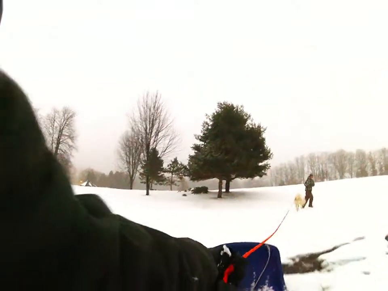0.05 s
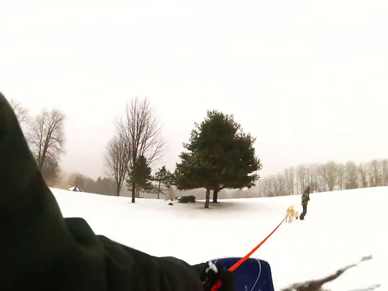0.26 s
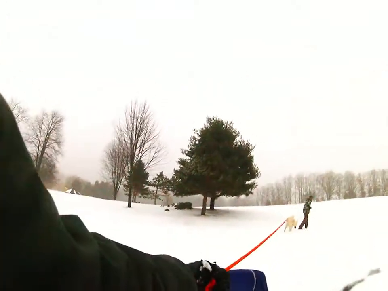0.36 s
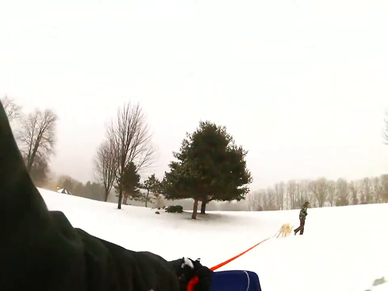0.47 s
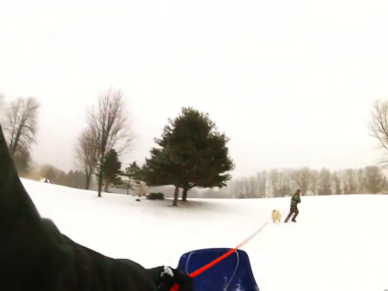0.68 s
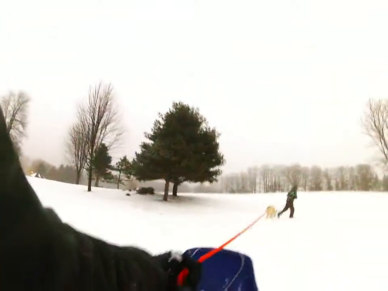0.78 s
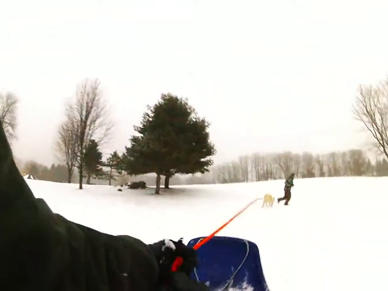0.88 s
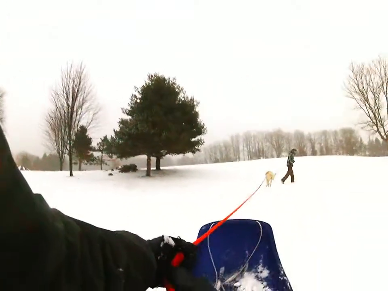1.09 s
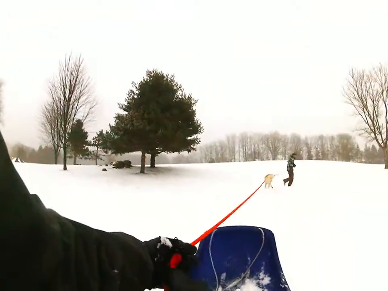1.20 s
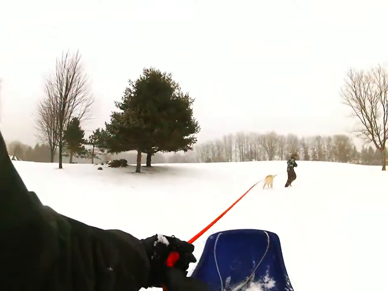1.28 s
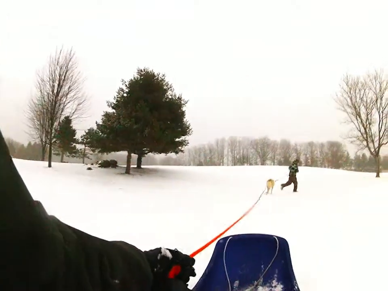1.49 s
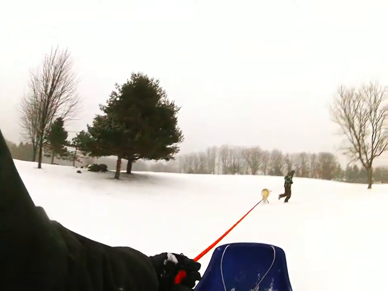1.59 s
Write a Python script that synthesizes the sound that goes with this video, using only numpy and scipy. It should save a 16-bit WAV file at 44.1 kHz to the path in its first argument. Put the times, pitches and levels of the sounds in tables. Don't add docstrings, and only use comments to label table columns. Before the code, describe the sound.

A plastic sled glides over snow with a soft hiss and light scrapes, then hits rough crust with a hard crack, hollow knocks and rasping, before easing to quiet hiss; outdoors, close, muffled camera on the rider.

```python
import sys
import numpy as np
from scipy import signal
from scipy.fft import rfft, irfft
from scipy.io import wavfile
from scipy.ndimage import uniform_filter1d

SR = 44100
rng = np.random.default_rng(int(sys.argv[2]) if len(sys.argv) > 2 else 0)


def voltage_ratio(level):
    return 10 ** (np.asarray(level, float) / 20)


def to_wav(s):
    ch = np.atleast_2d(s).T
    pcm = np.round(np.clip(ch, -1, 1) * 32767)
    wavfile.write(sys.argv[1], SR, pcm.astype(np.int16))


N = 72765


def level(x):
    return x / np.sqrt(np.mean(x ** 2))


def curve(table, axis=1):
    points = np.array(table)
    return np.interp(np.arange(N) / SR, points[:, 0], points[:, axis])


def colour(x, table):
    hz, db = np.array(table).T
    log_hz = np.log(np.fft.rfftfreq(N, 1 / SR) + 1)
    return irfft(rfft(x) * voltage_ratio(np.interp(log_hz, np.log(hz), db)), N)


def ring(x, table):
    out = 0
    for k, (hz, width, db) in enumerate(table):
        out = out + (-1) ** k * voltage_ratio(db) * signal.lfilter(*signal.iirpeak(hz, hz / width, SR), x)
    return out


def band(x, order, hz, kind="band"):
    return signal.sosfilt(signal.butter(order, hz, kind, fs=SR, output="sos"), x)


def walk(rate):
    hold = int(SR / rate)
    v = np.repeat(rng.standard_normal(N), hold)[:N]
    v = uniform_filter1d(uniform_filter1d(v, hold), hold)
    return v / v.std()


def grains(rate, spread_db):
    chance, sign, size = rng.random((3, N))
    clicks = (chance < rate / SR) * np.sign(sign - .5)
    return level(clicks * voltage_ratio(-spread_db * np.log(size + 1e-9)))


# (f/Hz, width/Hz, level/dB)
CASE_MODES = [(1141, 103, 4.5), (1702, 302, 2), (1895, 154, 4), (2452, 218, 1.5), (3014, 350, -13),
              (3430, 88, 0), (3980, 100, -12)]


def case(x):
    return ring(x, CASE_MODES) + voltage_ratio(-10) * x


# (t/s, pressure level/dB, lumpiness/dB)
PRESSURE = [(0,-53,-1.5),(.16,-52.5,-7.5),(.248,-44.5,-6),(.28,-55.5,-3),(.41,-50,-5.5),(.478,-47,5.5),(.492,-40,9),(.535,-42,0.5),(.565,-41.5,-8.5),(.62,-40,0.5),(.675,-38.5,4),(.735,-45.5,9.5),(.79,-42,2),(.86,-47,-6),(.97,-45,-10.5),(1.015,-50,-2),(1.09,-57.5,-4),(1.65,-60,-1.5)]
# (f/Hz, width/Hz, level/dB)
HULL_MODES = [(227, 40, -0.5), (298.5, 20.8, 4.5), (340, 33, 1), (388, 27.2, 4), (430, 114, -4),
              (546, 117, -4), (863, 590, -13.5)]
# (f/Hz, level/dB per Hz)
RASP_COLOUR = [(500, 5.5), (1200, -5.5), (2500, -4), (4500, -12), (7000, -27.5), (10000, -5.5),
               (12000, -9.5), (15000, -13)]


def scrape():
    pressure_db, lumpy_db = curve(PRESSURE), curve(PRESSURE, axis=2)
    stutter = walk(46.23)
    hull = level(ring(grains(800, 1.8), HULL_MODES))
    hull_db = pressure_db + lumpy_db - 4.5 + 0.58 * stutter + 0.27 * walk(30.2)
    rasp = level(case(colour(grains(5000, 1.75), RASP_COLOUR)))
    flicker_db = 1.2 * stutter + 1.3 * walk(90)
    rasp_db = 1.21 * (pressure_db + 41) - 43 - 3.5 + flicker_db
    return hull * voltage_ratio(hull_db) + rasp * voltage_ratio(rasp_db)


def damped_swings(events):
    out, t = np.zeros(N + 4096), np.arange(4096) / SR
    rise = 1 - np.exp(-t / 0.0015)
    for s, db, hz, t60 in events:
        i = int(s * SR)
        out[i:i + 4096] += voltage_ratio(db - 5.5) * np.sin(2 * np.pi * hz * t) * rise * 1000 ** (-t / t60)
    return out[:N]


# (t/s, peak level/dB, ring f/Hz, t60/s)
LUMPS = [(0.118,-30.5,457,0.012),(.173,-37.5,302,0.045),(0.237,-34,350,0.019),(0.328,-34,290,0.02),(0.378,-37.5,348,0.087),(0.422,-24,337,0.036),(.447,-26.5,315,0.045),(0.501,-31,272,0.05),(.484,-36,527,0.011),(0.5048,-19,308,.035),(.516,-23,360,0.038),(0.544,-30,300,0.023),(0.579,-20,340,0.021),(0.61,-21,303,0.046),(.651,-24.5,372,0.072),(.675,-20.5,452,0.076),(.692,-30,328,0.046),(0.713,-23,410,0.071),(0.732,-22,271,0.072),(0.748,-31,297,0.096),(0.766,-31,420,0.022),(.486,-26,830,.02),(.503,-24.5,693,0.018),(.756,-33,760,0.031),(.776,-30,868,0.048),(0.909,-43,252,0.026),(1.0345,-32,810,0.011),(1.066,-38,900,.006),(1.4505,-34.5,664,0.012),(1.4506,-34,206,0.018),(.988,-33,330,.03),(0.032,-39,280,0.061),(0.261,-44,315,0.057),(.948,-38.5,388,0.13),(1.037,-27,340,0.037),(1.068,-16.5,246,0.0061),(1.452,-28,330,0.01),(1.617,-31,218,0.012)]


def knocks():
    return damped_swings(LUMPS)


# (t/s, peak level/dB, length/s, brightness/dB, rise/s)
SNAPS = [(0.487,-32,0.0038,-4,0.00091),(0.49,-43,0.0087,-2,0.003),(0.503,-32,0.0027,-5,0.0011),(0.51,-37,0.012,-5,0.003),(0.5174,-38,0.014,-3,0.0011),(0.531,-37,0.0071,-2,0.001),(0.605,-37,0.016,-6,0.002),(0.645,-53,0.0087,0,0.0033),(0.657,-40,0.013,-5,0.0011),(0.666,-33.5,0.012,-7,0.0015),(0.674,-34,0.0077,-5,0.002),(0.7044,-32.5,0.013,-4.5,0.0013),(0.71,-33.5,0.014,-5.5,0.0018),(0.724,-36,0.0092,2,0.0025),(0.764,-35,0.014,-3,0.017),(0.78,-44,0.019,2,0.004),(0.819,-37,0.009,-5,0.0015),(0.848,-45.5,0.026,2.5,.01),(0.897,-47,.03,4,.01),(0.695,-44,0.011,5,.004),(0.748,-49,0.013,-1,.004),(0.942,-38.5,0.0054,-3,0.00092),(1.036,-47.5,0.0058,-12,0.00045),(1.066,-39,0.002,-3,0.00039),(1.372,-41,0.0028,-5,0.00084),(1.448,-45.5,0.0041,-6,0.00046)]


def snaps():
    t, mid, top = np.arange(N) / SR, np.zeros(N), np.zeros(N)
    for s, db, length, bright_db, rise in SNAPS:
        u = np.maximum(t - s, 0)
        env = voltage_ratio(db - 7) * (1 - np.exp(-u / rise)) * np.exp(-(u / length) ** 2)
        mid += env
        top += env * voltage_ratio(bright_db)
    noise = rng.standard_normal((2, N))
    low = band(mid * noise[0], 2, [600, 4000])
    high = band(top * noise[1], 4, 7200, "high")
    return 3.92 * case(low) + high


CRACK_S = .4697
# (f/Hz, width/Hz, level/dB)
PLATE_MODES = [(1118, 150, -4), (1560, 350, -6), (1975, 220, 0), (2560, 380, -5), (3200, 400, -8),
               (3850, 300, -13)]
# (f/Hz, width/Hz, level/dB)
FIZZ = [(8600, 1100, 1), (10000, 1000, 0), (13900, 1500, -.5)]


def crack():
    hold_s, decay_s, level_db, fizz_db = .0038, .0016, -24.5, -8
    splits_s = np.array([0, .002, .0035])
    u = np.arange(N) / SR - CRACK_S
    env = (u > 0) * np.exp(-np.maximum(u - hold_s, 0) / decay_s)
    noise = env * rng.standard_normal(N)
    steps = np.zeros(N)
    steps[((CRACK_S + splits_s) * SR).astype(int)] = .65 ** np.arange(len(splits_s))
    body = band(ring(steps + .04 * noise, PLATE_MODES), 4, [850, 4000])
    fizz = sum(ring(ring(noise, [mode]), [mode]) for mode in FIZZ)
    return voltage_ratio(level_db) * (body / abs(body).max() + voltage_ratio(fizz_db) * fizz / abs(fizz).max())


# (t/s, length/s, f/Hz, level/dB)
SQUEAKS = [
    (.043, .007, 1650, -52),
    (.044, .006, 2050, -54),
    (.055, .035, 1170, -55),
    (.2, .012, 2050, -57),
    (.24, .025, 1150, -56),
    (.525, .03, 1920, -46),
    (.875, .05, 2520, -49),
    (.987, .014, 1150, -46),
]


def squeaks():
    t, noise, out = np.arange(N) / SR, rng.standard_normal(N), np.zeros(N)
    for s, length, hz, db in SQUEAKS:
        swell = np.sin(np.pi * np.clip((t - s) / length, 0, 1))
        out += voltage_ratio(db) * level(ring(noise, [(hz, 110, 0)])) * swell
    return out


# (t/s, peak level/dB, swing f/Hz, up 1 or down -1)
JOLTS = [(0.214,-35,61,1),(.553,-25,60.7,1),(.613,-26,30,1),(0.744,-22.5,39.5,-1),(0.849,-38,40,1),(.925,-42,58,-1),(1.059,-28.5,109,1),(1.079,-36,45,-1),(1.099,-34,49,-1),(1.113,-33.5,25,1),(1.129,-31.5,90,-1),(1.28,-46,60,-1),(1.401,-43,29.8,1),(1.497,-41.5,72,-1)]


def jolts():
    return damped_swings([(s, db, hz * np.sign(way), 3 / hz) for s, db, hz, way in JOLTS])


# (t/s, level/dB)
GLIDE = [
    (0, -55.5),
    (.17, -58.5),
    (.255, -58.5),
    (.285, -62.5),
    (.44, -61),
    (.6, -54),
    (1.0, -55.5),
    (1.2, -59),
    (1.6, -53),
    (1.65, -59.5),
]
# (f/Hz, level/dB per Hz)
HISS_COLOUR = [(300, -15.5), (900, -19), (2000, -5), (4000, 3.5), (6000, -2), (8500, -1), (11500, -17.5),
               (14500, -8)]


def glide():
    flicker_db = .9 * walk(20) + .6 * walk(70)
    hiss = level(case(colour(grains(12000, 0.5), HISS_COLOUR)))
    return hiss * voltage_ratio(curve(GLIDE) + flicker_db)


# (t/s, level/dB)
SHAKE = [(0,-55),(.17,-62.5),(.22,-51),(.33,-61),(.5,-51),(.6,-45),(.76,-46.5),(.82,-51),(.97,-49),(1.01,-52.5),(1.12,-56),(1.17,-61.5),(1.3,-58.5),(1.5,-59),(1.65,-64)]
# (f/Hz, level/dB)
RUMBLE_COLOUR = [(28, 0), (44, -1.5), (90, -2), (200, -9), (400, -21), (700, -39)]


def shake():
    rumble = level(colour(rng.standard_normal(N), RUMBLE_COLOUR))
    return rumble * voltage_ratio(curve(SHAKE) + 0.5 * walk(14.1))


# (f/Hz, level/dB)
KEPT = [(4000, -22), (5000, -12), (9500, -10), (10300, -3), (11500, 1), (13200, 1), (14000, -4),
        (15200, -7)]
# (f/Hz, half width/Hz, extra level/dB, dB per dB of loudness)
LOST_FIRST = [(5150, 60, 9, .6), (6050, 190, 15, 1.2), (6900, 60, 9, .6), (10450, 120, 8, 0),
              (11250, 210, 11, 0), (12050, 130, 9, 1.3), (12900, 210, 12, 0), (13650, 130, 11, 0)]


def thin_lines(x):
    top_hz = 15230
    f, _, z = signal.stft(x, SR, nperseg=2048)
    treble_db = 10 * np.log10(np.sum(abs(z[f > 7000]) ** 2, axis=0) + 1e-12)
    loud_db = np.clip(treble_db - np.percentile(treble_db, 35), -3, 12)
    luck = np.repeat(rng.standard_normal((len(f) // 12 + 1, z.shape[1])), 12, axis=0)[:len(f)]
    floor_db = np.interp(f, *np.array(KEPT).T)[:, None] - 1.1 * loud_db + 4.5 * luck
    for hz, half_width, db, follow in LOST_FIRST:
        floor_db = floor_db + (abs(f - hz) < half_width)[:, None] * (db + follow * loud_db)
    near = np.sqrt(abs(uniform_filter1d(abs(z) ** 2, size=60, axis=0)))
    kept = (abs(z) > near * voltage_ratio(floor_db)) * (f < top_hz)[:, None]
    around_crack = np.exp(-((np.arange(N) / SR - CRACK_S - .003) / .004) ** 2)
    top = band(x * around_crack, 6, [top_hz, 16100])
    return signal.istft(z * kept, SR, nperseg=2048)[1][:N] + top


def scene():
    patch = scrape() + knocks() + snaps() + crack() + squeaks()
    return (patch + jolts() + glide() + shake())[None]


def band_limit(x):
    return signal.sosfilt(signal.butter(12, 16330, fs=SR, output="sos"), x)


# (f/Hz, width/Hz)
NOTCHES = [(6050, 175), (12050, 1140)]


def record(dry):
    x = dry[0]
    for hz, width in NOTCHES:
        x = signal.lfilter(*signal.iirnotch(hz, hz / width, SR), x)
    mix = thin_lines(x)[None]
    return band_limit(mix)


dry = scene()
out = record(dry)
to_wav(out)
```